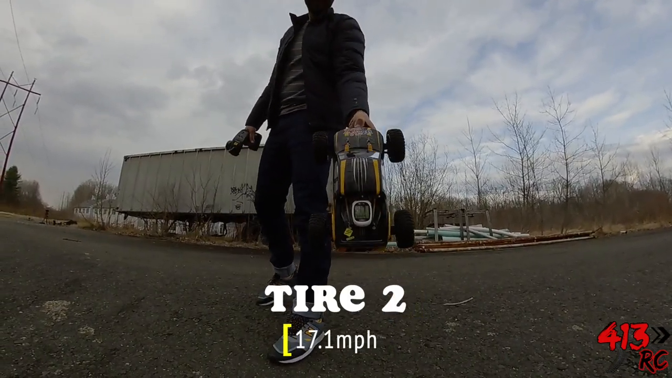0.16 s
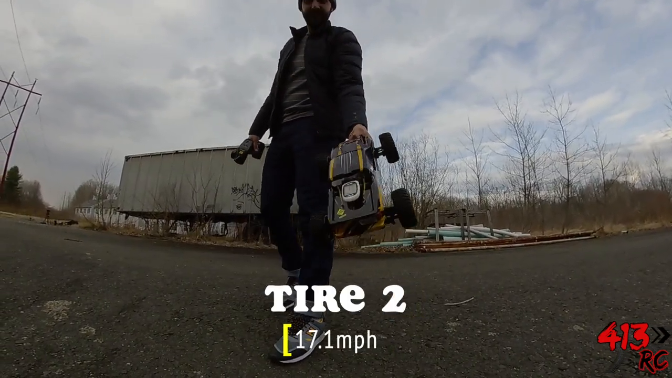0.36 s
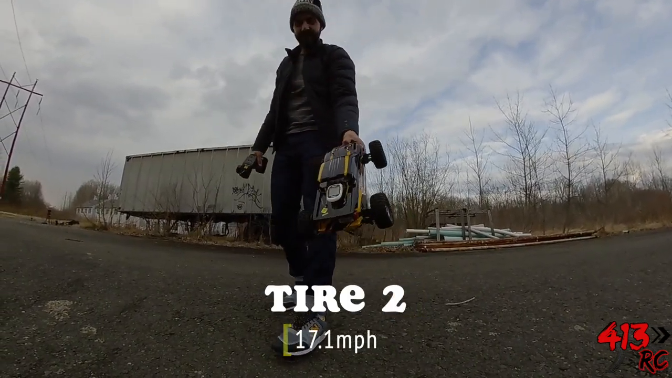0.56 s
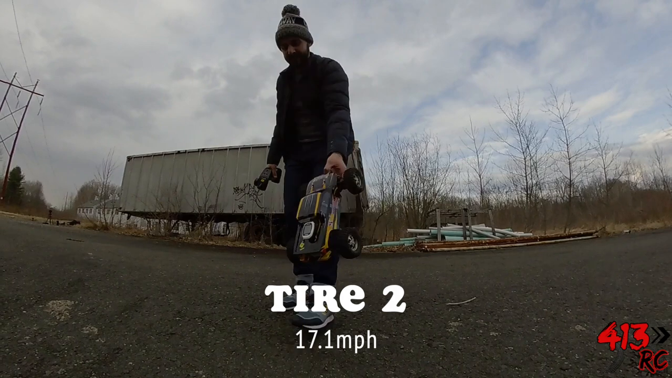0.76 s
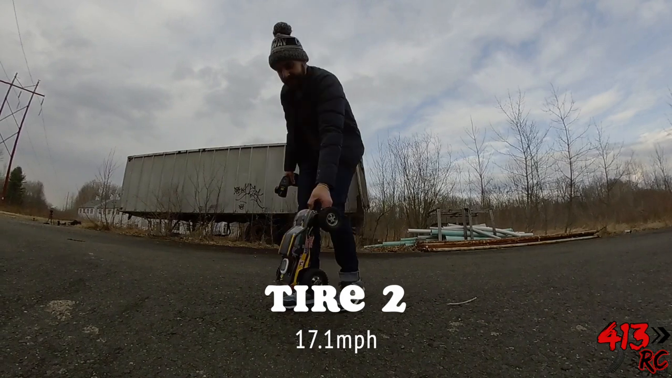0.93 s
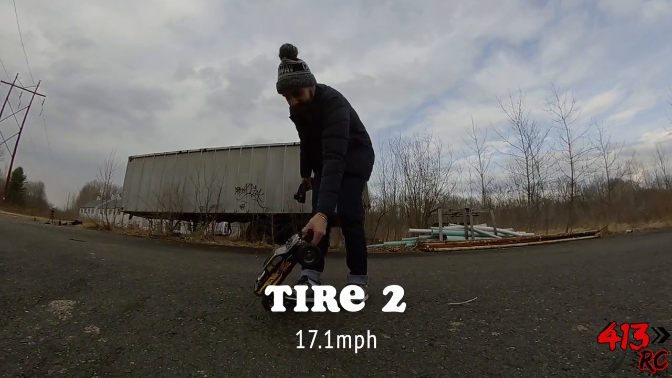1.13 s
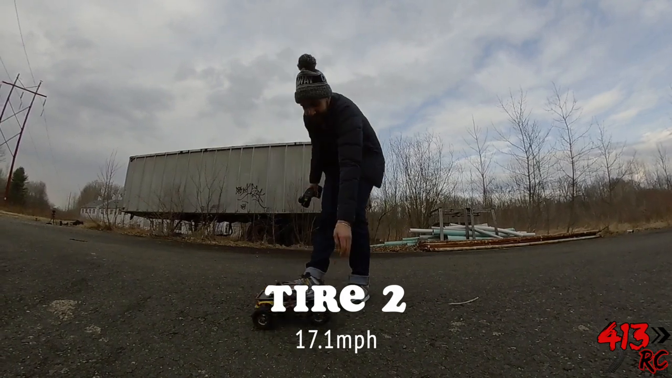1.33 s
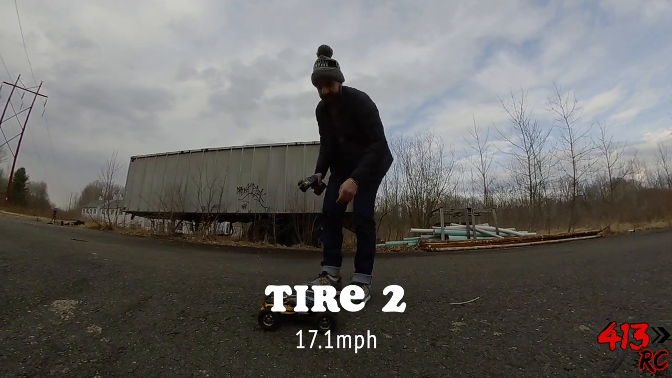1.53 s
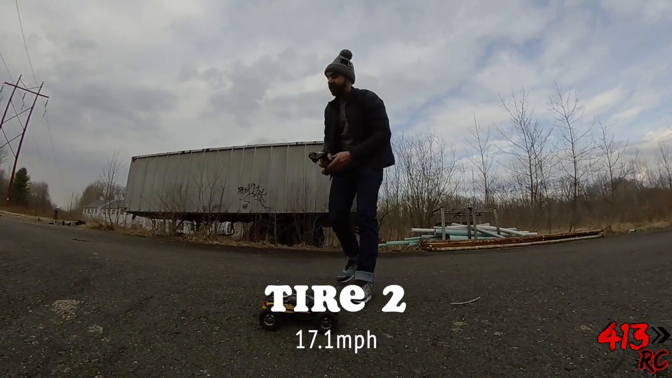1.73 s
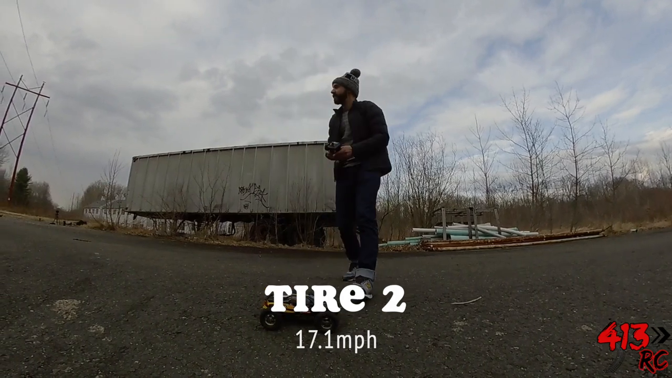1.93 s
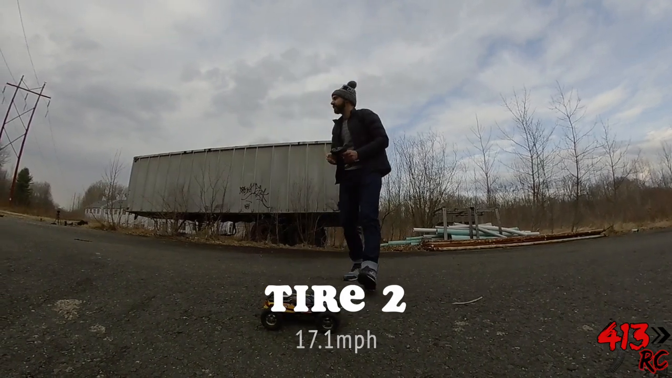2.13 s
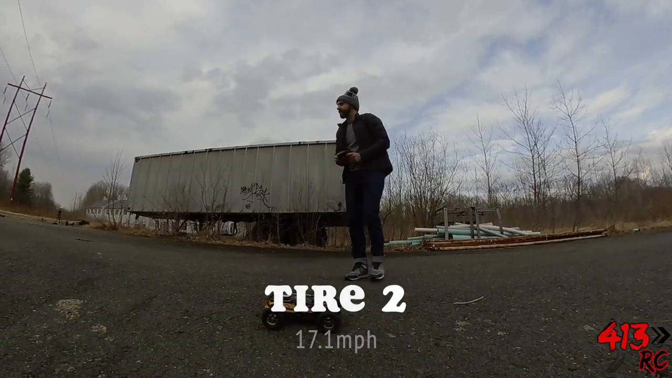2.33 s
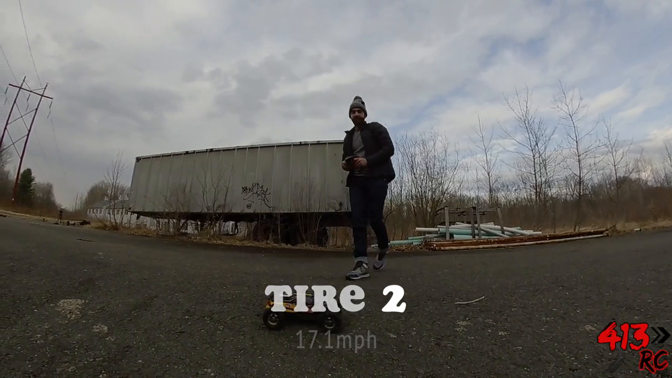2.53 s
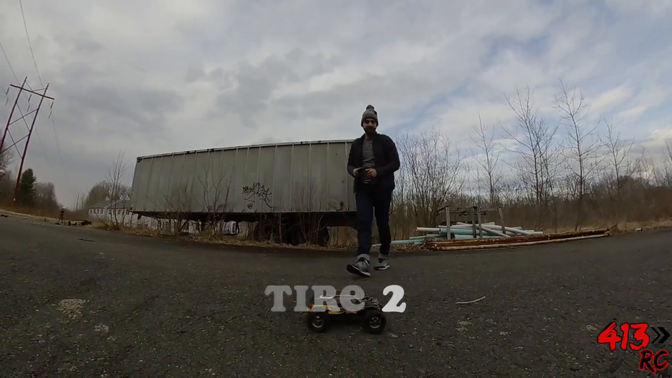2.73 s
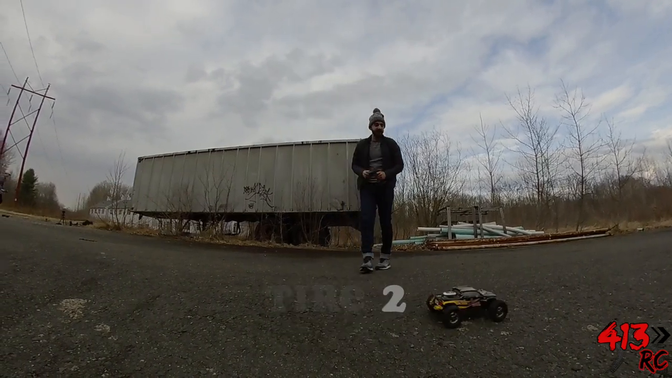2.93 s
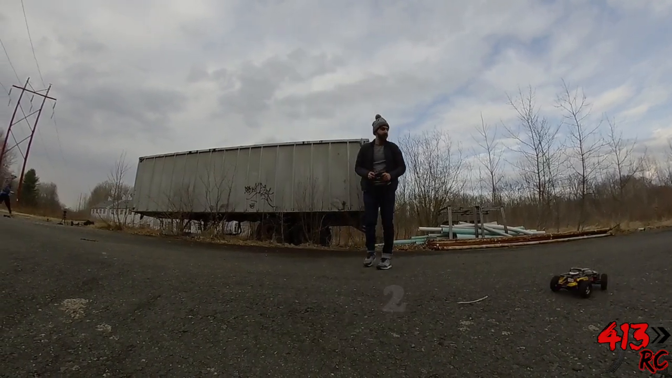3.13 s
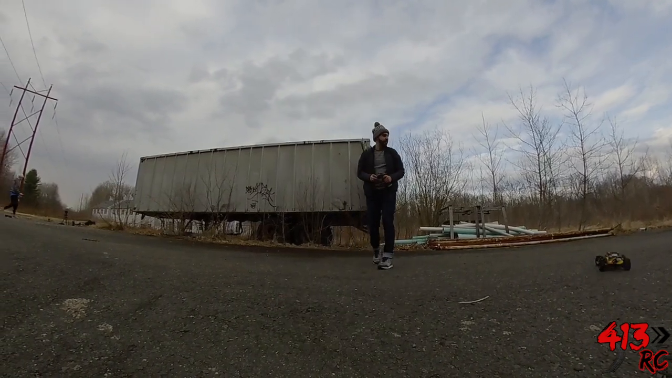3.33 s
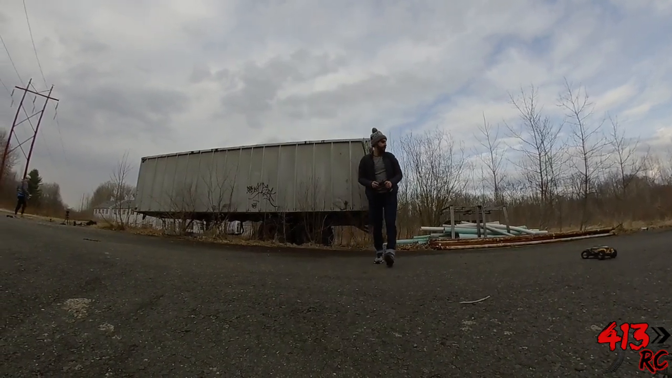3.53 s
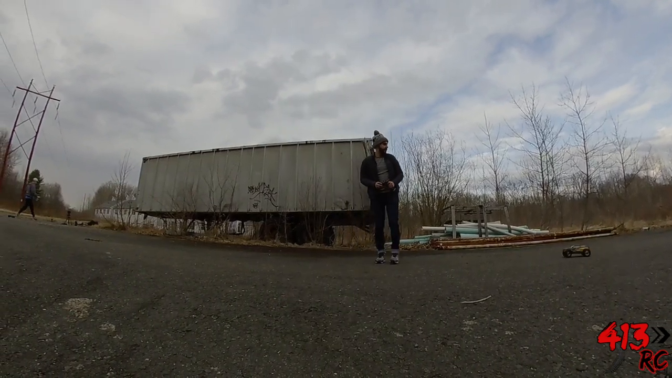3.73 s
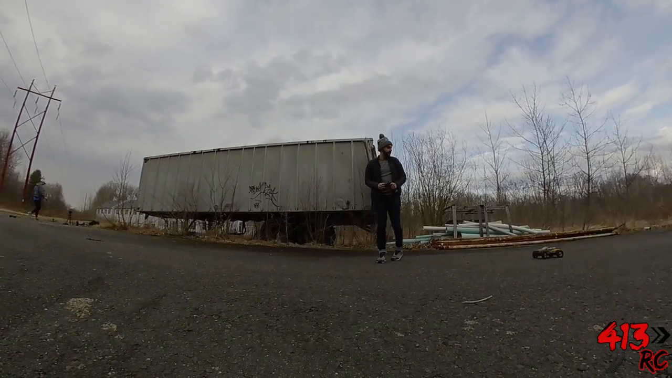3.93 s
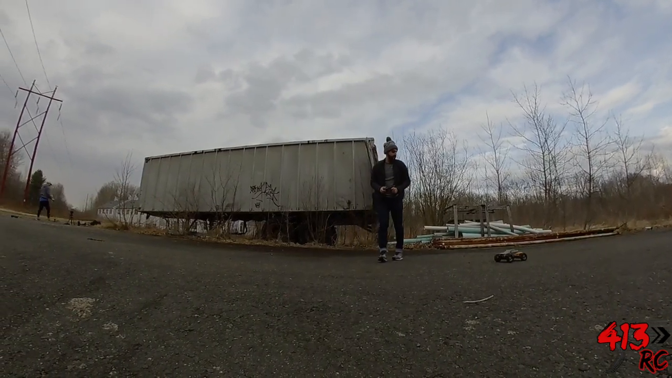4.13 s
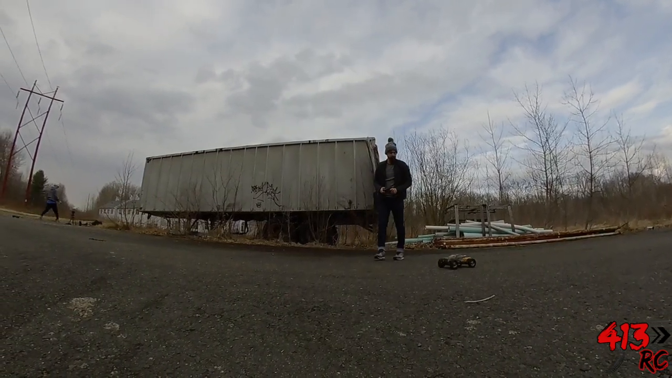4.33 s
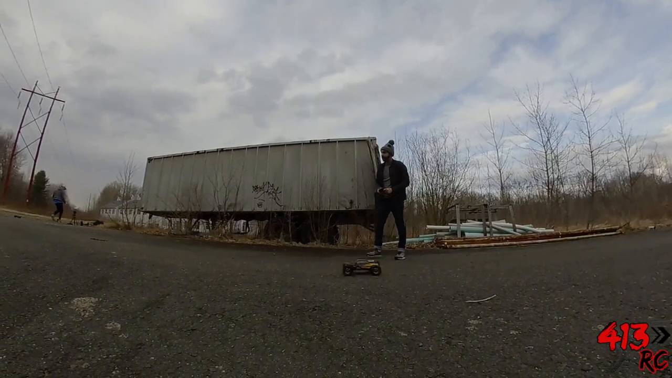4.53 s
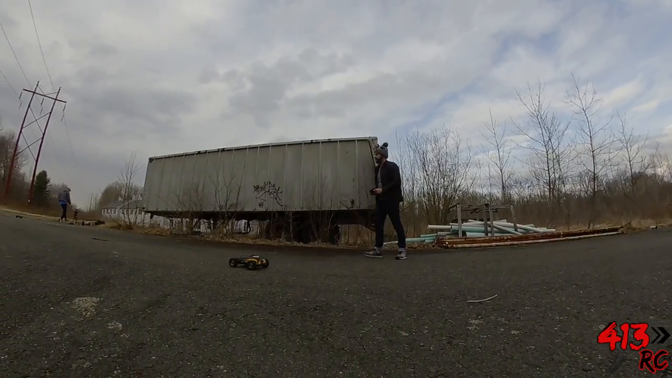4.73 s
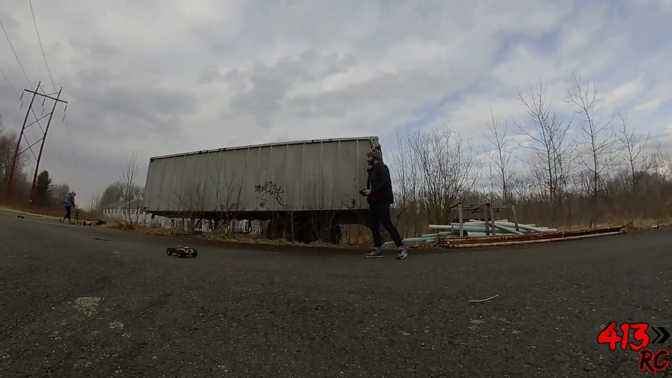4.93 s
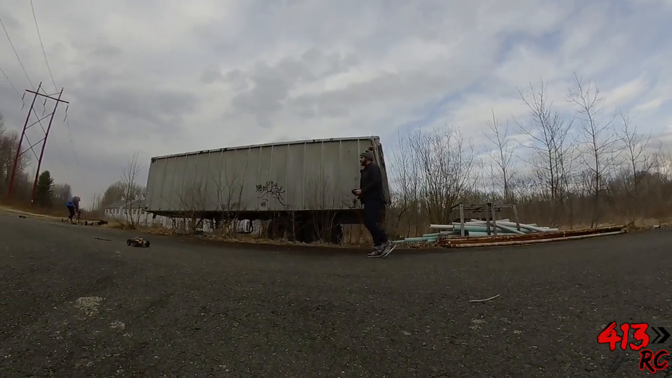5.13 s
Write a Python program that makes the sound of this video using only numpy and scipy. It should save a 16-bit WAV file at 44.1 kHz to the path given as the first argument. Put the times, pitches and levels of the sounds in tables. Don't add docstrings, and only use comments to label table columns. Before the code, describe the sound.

Shoes scrape on grit, a plastic toy truck drops with a rattle, and its motor whines upward over roaring tyres and flicked stones.

```python
import sys
import numpy as np
from scipy import signal
from scipy.fft import rfft, irfft, next_fast_len
from scipy.io import wavfile
from scipy.ndimage import uniform_filter1d, map_coordinates

SR = 44100
rng = np.random.default_rng(int(sys.argv[2]) if len(sys.argv) > 2 else 0)


def to_wav(sig):
    pcm = np.clip(np.atleast_2d(sig), -1, 1) * 32767
    pcm = np.round(pcm).astype(np.int16)
    wavfile.write(sys.argv[1], SR, pcm.T)


def decibels_to_gain(level_db):
    exponent = np.asarray(level_db, float) / 20
    return 10 ** exponent


N = 227688
TIME = np.arange(N) / SR

# pitch in Hz, level in dB per Hz.
TRAFFIC_COLOUR = [(12, -61), (20, -26), (32, -52), (107, -20.5), (146, 1.5), (290, -11), (335, -12),
                  (447, -13.5), (1350, -29.5), (1500, -40), (1950, -61), (3300, -120)]
TRAFFIC_DB = -58
# pitch in Hz, level in dB per Hz.
RUSTLE_COLOUR = [(410, -28), (700, -2.5), (859, -2.5), (6270, -15.5), (8320, -10.5), (10200, -21),
                 (12500, -17), (13400, -41), (15000, -53)]
# time in seconds, level in dB.
RUSTLE_LEVEL = [(0, -61.5), (.4, -63), (.9, -60), (1.24, -63), (1.52, -61), (1.96, -61.5), (2.14, -65.5)]

# start in seconds, peak in dB, ring in Hz, low knock in dB.
SHOE_GRIT = [(0.0044, -47.5, 1450, -14), (0.0822, -40, 7440, -28), (0.141, -41.5, 7000, -8),
             (0.277, -47, 6500, -20), (0.3401, -51, 1920, -13), (0.411, -48, 6000, -20),
             (0.4299, -42, 3400, -20), (0.4675, -41, 4000, -19), (0.472, -39.5, 7000, -19),
             (0.511, -48, 1750, -4), (0.578, -50, 2090, -10), (0.626, -46.5, 1846, -12),
             (0.661, -45, 4500, -18), (0.6655, -37, 4150, -18), (0.935, -37, 1500, -20),
             (1.0021, -42, 3410, -21), (1.1, -46, 2510, -18), (1.1384, -49, 3030, -8),
             (1.2233, -44, 2600, -1), (1.2636, -47, 1250, 3), (1.798, -48.5, 1640, -18),
             (1.8517, -46, 1350, 7.5), (1.9, -42.5, 2200, -18), (1.952, -36, 4500, -16),
             (1.971, -43, 2630, -24), (2.053, -44, 5000, -20), (2.058, -31, 5200, -14),
             (2.0715, -33, 2100, 5), (2.1346, -51, 1210, 9), (2.3675, -41, 1630, -19)]
# start in seconds, peak in dB, ring in Hz, low knock in dB.
TYRE_STONES = [(2.7236, -27, 1470, -13), (2.8723, -31, 1380, -1.5), (3.0117, -22, 1010, -12),
               (3.1946, -30, 1450, -15), (3.226, -33, 2500, -12), (3.282, -33, 520, -6),
               (3.325, -32, 660, -6), (3.4231, -31, 1210, -6), (3.581, -28, 1400, -6),
               (3.8046, -37, 1956, -21), (3.9095, -32, 3020, -12), (3.9125, -23, 1300, -16),
               (3.917, -26, 950, -16), (4.247, -29, 700, -6), (4.361, -34, 2140, -15),
               (4.5648, -26.5, 1070, -12), (4.6648, -30.5, 7500, -8), (4.9154, -37, 1604, -8),
               (5.0545, -23.5, 1650, -16)]
SNAP = 6
# start in seconds, length in seconds, level in dB,
# sand over rubber in dB, dust over sand in dB.
SOLE_SCUFFS = [(.934, 0.056, -41, -10.5, -10), (2.047, 0.042, -60, 9, -5), (.662, 0.029, -62.5, 8, -30),
               (.43, 0.08, -66, 5, -30), (1.755, 0.046, -68, 10, 0), (2.115, .03, -59, -7, -30),
               (1.42, 0.088, -54, -4, -10), (.76, .14, -69, 2.5, -8), (2.545, 0.027, -60, -9, -30),
               (0.0, .025, -62, 4, -30)]
# pitch in Hz, width in Hz, level in dB.
SOLE_RINGS = [(680, 810, -4.5), (1450, 250, 3.5), (1860, 310, -3.5), (2820, 550, -4.5)]
# pitch in Hz, width in Hz, level in dB.
SAND_RINGS = [(4230, 2700, -3), (8100, 1600, -2.5)]
# pitch in Hz, width in Hz, level in dB.
DUST_RINGS = [(14800, 2000, 0)]

# start in seconds, peak in dB,
# thump in dB, grit in dB, pitch of the part struck in Hz.
WHEEL_LANDINGS = [(1.355, -30, -14, -30, 500), (1.368, -21.5, -12, -28, 800), (1.377, -17, -6, -12, 1600),
                  (1.383, -24, -14, -20, 650), (1.3875, -13, -24, -14, 800), (1.391, -8.5, -24, -16, 600),
                  (1.396, -16, -32, -14, 620), (1.401, -18, -38, -6, 1900), (1.408, -19, -29, -14, 520),
                  (1.424, -30, -19, -14, 420), (1.44, -31, -20, -21, 350), (1.474, -36, -23.5, -21, 800),
                  (1.528, -33, -30, -30, 1250), (1.535, -32.5, -30, -30, 1300), (1.541, -38, -30, -30, 900)]
# pitch in Hz, width in Hz, level in dB.
BODY_RINGS = [(275, 180, -2), (647, 244, 5), (1310, 680, -4), (1940, 430, -2.5), (3400, 1200, -14),
              (7750, 4100, -20)]
CONTACT_S = .024
PART_DB = 7
FAVOUR_DB = 4
PUSH_S, PUSH_DB, PUSH_LENGTH_S = 1.378, -56, .008

# time in seconds, chop pitch in Hz, level in dB.
STALLED_MOTOR = [(2.52, 1120, -64), (2.54, 1115, -54), (2.555, 1117, -43.5), (2.59, 1096, -43),
                 (2.62, 1095, -43), (2.65, 1092, -50)]
# multiple of the chop pitch, level in dB.
CHOP_OVERTONES = [(2, -65), (3, -73), (4, -77), (5, -65), (7, -74)]

# time in seconds, tyre roar in dB, drivetrain hiss in dB.
ROLLING_LEVELS = [(2.56, -53.5, -74), (2.62, -51, -63.5), (2.67, -42, -50.5), (2.75, -38, -46.5),
                  (2.86, -39.5, -41.5), (3.05, -38, -40.5), (3.14, -38, -41.5), (3.21, -39, -44),
                  (3.63, -44, -52.5), (3.67, -47, -53), (3.8, -45, -46.5), (4.08, -43, -44.5),
                  (4.44, -43, -45), (4.51, -37.5, -43.5), (4.6, -36, -43), (4.645, -41, -46),
                  (4.75, -41.5, -48), (5.16, -45, -43.5)]
# pitch in Hz, level in dB per Hz.
ROAR_COLOUR = [(120, -34), (200, -11), (285, -11.5), (431, 2), (646, -4), (1100, -11), (1500, -18),
               (1950, -23), (3300, -120)]
# pitch in Hz, level in dB per Hz.
RATTLE_COLOUR = [(350, -29), (600, -5), (1330, 0), (2500, -9), (3120, -10), (3930, -20.5), (5000, -24.5),
                 (6500, -28), (11000, -120)]
# pitch in Hz, level in dB per Hz.
HISS_COLOUR = [(2060, -12), (3500, -2), (3940, -6), (6080, -2), (7900, 3), (9040, -4), (10600, -15.5),
               (12000, -28.5), (15600, -55), (22000, -120)]
# pitch in Hz, level in dB per Hz.
FIZZ_COLOUR = [(6760, -40), (11500, -11), (12300, -9), (13300, 1), (13800, 3), (14500, -1), (15000, -4),
               (15500, -12)]
# time in seconds, extra level in dB.
ROAD_CRACKS = [(2.672, 4.5), (2.72, 4), (2.8, 5), (2.88, 3), (2.93, 3), (3.02, 2.5), (4.57, 1.5),
               (4.67, 0.5)]
JOLT_S = 0.011
RATTLE_DB, RATTLE_GROWS = 1, 1.17
TORQUE_DB, STALL_HZ, FREE_HZ = 6, 900, 3160
FIZZ_DB, FIZZ_GROWS, THROTTLE_FIZZ_DB = -57.5, 1.15, 3

# time in seconds, gear tooth pitch in Hz, steady whine in dB.
FIRST_PULL = [(2.615, 450, -56), (2.65, 800, -37), (2.675, 1130, -28.5), (2.72, 1350, -34),
              (2.77, 1505, -32), (2.828, 1600, -58), (2.848, 1950, -50), (2.98, 2320, -56),
              (3.15, 2540, -58)]
# time in seconds, gear tooth pitch in Hz, steady whine in dB.
SECOND_PULL = [(3.66, 1010, -44), (3.735, 1260, -44), (3.78, 1540, -56), (3.94, 2050, -58),
               (4.12, 2420, -58), (4.4, 2720, -59), (4.55, 3280, -58), (4.81, 2740, -56), (4.95, 3080, -52),
               (5.16, 3330, -59)]
# on in seconds, off in seconds.
THROTTLE_ON = [
    (2.62, 3.165),
    (3.66, 4.635),
    (4.785, 6),
]
# landing in seconds,
# bite length in seconds, overspin as a share, whine in dB, lead of the whine in seconds.
WHEEL_BITES = [(2.7, .02, .06, -42, 0), (2.742, .018, .17, -36, .015), (2.785, .012, .13, -41, .015),
               (2.813, .016, .16, -35, -.004), (2.876, .016, .17, -40, .004), (2.907, .018, 0, -38, 0),
               (2.952, .02, .21, -37, 0), (2.996, .024, .13, -35, 0), (3.04, .03, .09, -36, 0),
               (3.1, .014, .09, -46, .02), (3.71, .02, .21, -40, 0), (3.752, .013, .13, -41, .022),
               (3.765, .016, .13, -37, -.002), (3.8, .016, .27, -41, 0), (3.838, .006, .16, -42, .024),
               (3.878, .014, .17, -40, 0), (3.924, .016, .13, -43, 0), (3.955, .022, .17, -43, 0),
               (3.996, .014, .21, -40, 0), (4.036, .04, .17, -44, .03), (4.07, .02, .08, -43, .012),
               (4.092, .034, .1, -42, 0), (4.15, .03, .1, -58, .04), (4.18, .065, .09, -47, -.012),
               (4.27, .03, .09, -56, 0), (4.3, .035, .07, -45, -.01), (4.365, .045, .06, -51, -.01),
               (4.435, .06, .05, -51, 0), (4.6, .035, .04, -55, 0), (4.79, .03, .07, -52, 0)]
SPIN_UP_S = .022
# tooth pitch in Hz, level in dB.
SECOND_HARMONIC = [(600, 3), (1000, -21), (1330, -18), (1500, -15), (1660, -18), (1780, -32), (2650, -26),
                   (2950, -12), (3100, -2), (3330, 8)]
STANDING_START_DB = 9
# tooth pitch in Hz, level in dB.
THIRD_HARMONIC = [(1500, -33), (1900, -13), (2500, -4), (2800, -3), (3100, -12), (3400, -22)]
# start in seconds, length in seconds,
# lift of the third harmonic in dB.
CLEAR_RINGS = [(2.84, .03, 4), (2.905, .022, 7), (3.072, .032, 7), (3.11, .012, 5), (3.132, .014, 5),
               (4.045, .05, 2), (4.14, .05, 2), (4.235, .025, 4), (4.32, .02, 4), (4.365, .045, 1)]
# start in seconds, length in seconds, pitch in Hz, width in Hz, level in dB.
BEARING_SQUEALS = [(3.187, .018, 8300, 500, -52), (3.775, .03, 7800, 500, -58),
                   (4.658, .03, 7700, 700, -49), (4.84, .03, 8200, 400, -56), (5.05, .2, 7300, 600, -53)]

# pitch in Hz, level in dB.
MICROPHONE = [(20, -18), (70, -25), (130, -0.5), (300, -3), (9000, 0.5), (11000, -14), (14000, -4),
              (15900, -9)]


def unit(x):
    return x / np.sqrt(np.mean(x ** 2) + 1e-20)


def peak1(x):
    return x / np.abs(x).max()


def add(out, s, x):
    part = out[round(s * SR):][:len(x)]
    part += x[:len(part)]


def curves(rows):
    s, *cols = np.transpose(rows)
    return [np.interp(TIME, s, c) for c in cols]


def law(points, hz):
    return decibels_to_gain(np.interp(hz, *np.transpose(points)))


def gate(start, end, edge):
    inside = np.minimum(TIME - start, end - TIME)
    return np.sin(np.pi / 2 * np.clip(inside / edge + .5, 0, 1)) ** 2


def wobble(rate):
    return map_coordinates(rng.standard_normal(int(N * rate / SR) + 4), [TIME * rate])


def filtered(x, response):
    m = next_fast_len(len(x) + 4096)
    return irfft(rfft(x, m) * response(np.fft.rfftfreq(m, 1 / SR)), m)[:len(x)]


def resonant(x, modes):
    def response(f):
        return sum((-1) ** k * decibels_to_gain(db) * 1j * f * w / (c * c - f * f + 1j * f * w)
                   for k, (c, w, db) in enumerate(modes))
    return filtered(x, response)


def coloured(x, spectrum):
    hz, db = np.transpose(spectrum)
    return filtered(x, lambda f: decibels_to_gain(np.interp(np.log(f + 1), np.log(hz), db)))


def rush(spectrum, grain_db, grain_rate, patchy_db):
    lumpy = rng.standard_normal(N) * decibels_to_gain(grain_db * wobble(grain_rate))
    z = signal.stft(lumpy, nperseg=512)[2]
    patches = uniform_filter1d(rng.standard_normal(z.shape), size=5, axis=0)
    patches = unit(uniform_filter1d(patches, size=5, axis=1))
    noise = signal.istft(z * decibels_to_gain(patchy_db * patches), nperseg=512)[1][:N]
    return unit(coloured(noise, spectrum))


def burst(length, rise=0.00087):
    t = TIME[:SR // 8]
    return rng.standard_normal(len(t)) * decibels_to_gain(-60 * t / length) * (1 - np.exp(-t / rise))


def blow(length):
    return burst(length, rise=.0003) + SNAP * (np.arange(SR // 8) == 2)


def drive():
    throttle = sum(gate(on, off, .03) for on, off in THROTTLE_ON)
    return (*curves(FIRST_PULL + SECOND_PULL), throttle)


def background():
    rustle_db, = curves(RUSTLE_LEVEL)
    hum = decibels_to_gain(TRAFFIC_DB) * rush(TRAFFIC_COLOUR, grain_db=1.5, grain_rate=12, patchy_db=1.5)
    rustle = rush(RUSTLE_COLOUR, grain_db=1.0, grain_rate=200, patchy_db=2.0)
    return hum + decibels_to_gain(rustle_db + 0.5 + 1.3 * wobble(13.9)) * rustle


def scuffs():
    rubber, sand, dust = np.zeros((3, N))
    for s, length, db, sand_db, dust_db in SOLE_SCUFFS:
        edges = np.minimum((TIME - s) / 0.0011, (s + length - TIME) / 0.0084)
        stroke = decibels_to_gain(db - 3 * (TIME - s) / length) * np.clip(edges, 0, 1)
        rubber += stroke
        sand += decibels_to_gain(sand_db) * stroke
        dust += decibels_to_gain(sand_db + dust_db) * stroke
    grains = rng.standard_normal(N) * decibels_to_gain(3.4 * wobble(400) + 1.5 * wobble(120))
    dull = resonant(resonant(grains, SOLE_RINGS), [(1290, 5000, 0)])
    fine = resonant(resonant(grains, SAND_RINGS), [(6000, 7000, 0)])
    finest = resonant(resonant(grains, DUST_RINGS), DUST_RINGS)
    return rubber * unit(dull) + sand * unit(fine) + dust * unit(finest)


def crunches(table, width, snap_db, length, tick_db):
    out = np.zeros(N)
    for s, db, hz, knock_db in table:
        crack = resonant(blow(length), [(hz, width * hz, 0), (1.85 * hz, 0.58 * hz, snap_db)])
        crack = filtered(crack, lambda f: 1 / (1 + 1j * f / (1.7 * hz)) ** 2)
        knock = resonant(blow(.6 * length), [(293, 206, 0), (750, 550, -9)])
        tick = resonant(blow(0.52 * length), [(4800, 2300, 0), (8000, 2500, -2)])
        tick = resonant(tick, [(6000, 6000, 0)])
        hit = peak1(crack) + decibels_to_gain(knock_db) * peak1(knock) + decibels_to_gain(tick_db - 2.0) * peak1(tick)
        add(out, s, decibels_to_gain(db + 1.5) * hit)
    return out


def landing():
    out = np.zeros(N)
    soft_blow = 3 * np.exp(-((np.arange(SR // 8) - 30) / 5) ** 2)
    for s, db, thump_db, grit_db, part_hz in WHEEL_LANDINGS:
        modes = [(hz, width, level - FAVOUR_DB * abs(np.log2(hz / part_hz)))
                 for hz, width, level in BODY_RINGS]
        place = sum(hz < part_hz for hz, *_ in BODY_RINGS)
        modes.insert(place, (part_hz, .2 * part_hz, PART_DB))
        body = resonant(burst(CONTACT_S, rise=0.0015) + soft_blow, modes)
        body = filtered(body, lambda f: 1 / (1 + 1j * f / 3500))
        grit = resonant(burst(2.1 * CONTACT_S), [(3800, 2500, 13), (7800, 3000, -16)])
        thump = resonant(resonant(burst(0.011), [(145, 60, 0)]), [(150, 210, 0)])
        hit = peak1(body) + decibels_to_gain(thump_db) * peak1(thump) + decibels_to_gain(grit_db + 1) * peak1(grit)
        add(out, s, decibels_to_gain(db - 0.5) * hit)
    return out


def push():
    u = np.clip((TIME - PUSH_S) / PUSH_LENGTH_S, 0, 50)
    return decibels_to_gain(PUSH_DB) * np.e * u * (2 - u) * np.exp(-u)


def windings():
    hz, db = curves(STALLED_MOTOR)
    turn = 2 * np.pi * np.cumsum(hz) / SR
    jerks = .55 + .45 * np.cos(2 * np.pi * 80 * (TIME - 2.553))
    jerks = jerks * decibels_to_gain(3 * wobble(60))
    tone = decibels_to_gain(db + 2.5) * jerks * np.sin(turn + 0.7 * wobble(150))
    overtones = sum(decibels_to_gain(level + 2.7 * wobble(35)) * np.sin(round(k) * turn) for k, level in CHOP_OVERTONES)
    return gate(2.522, 2.65, .012) * (tone + overtones)


def rolling():
    roar_db, hiss_db = curves(ROLLING_LEVELS)
    road_hz, _, throttle = drive()
    torque = throttle * np.clip((FREE_HZ - road_hz) / (FREE_HZ - STALL_HZ), 0, 1)
    jolt_db = sum(db * np.exp(-((TIME - s) / JOLT_S) ** 2) for s, db in ROAD_CRACKS)
    rattle_db = RATTLE_GROWS * (roar_db + 42) - 42 + RATTLE_DB + TORQUE_DB * torque + .3 * jolt_db
    fizz_db = FIZZ_DB + FIZZ_GROWS * (hiss_db + 43.5) + THROTTLE_FIZZ_DB * (throttle - 1) + .7 * jolt_db
    bumps = wobble(28.01)
    roar = rush(ROAR_COLOUR, grain_db=2.2, grain_rate=82, patchy_db=1.5)
    rattle = rush(RATTLE_COLOUR, grain_db=2.8, grain_rate=220, patchy_db=1.5)
    hiss = rush(HISS_COLOUR, grain_db=1.5, grain_rate=500, patchy_db=2.5)
    fizz = rush(FIZZ_COLOUR, grain_db=1.5, grain_rate=500, patchy_db=4)
    out = decibels_to_gain(roar_db + jolt_db + 0.6 * bumps) * roar
    out += decibels_to_gain(rattle_db - 2.0 + 0.95 * bumps) * rattle
    out += decibels_to_gain(hiss_db + 0.3 * jolt_db + 0.92 * bumps) * hiss
    out += decibels_to_gain(fizz_db + 2.2 * wobble(12)) * fizz
    return gate(2.56, 6, .04) * filtered(out, lambda f: f ** 4 / (f ** 4 + 165.0 ** 4))


def gears():
    road_hz, steady_db, throttle = drive()
    slip = sum(share * np.interp(TIME, [s - SPIN_UP_S, s, s + life], [0, 1, 0])
               for s, life, share, *_ in WHEEL_BITES)
    hz = uniform_filter1d(road_hz * (1 + slip), round(0.0055 * SR))
    hz = hz * (1 + 0.00607 * wobble(60))
    turn = 2 * np.pi * np.cumsum(hz) / SR
    rough = road_hz / FREE_HZ

    first = throttle * decibels_to_gain(steady_db + 1.5 * wobble(35) * rough)
    first = first + sum(decibels_to_gain(db) * gate(s - lead, s + life, 0.012) for s, life, _, db, lead in WHEEL_BITES)
    second = first * law(SECOND_HARMONIC, hz) * decibels_to_gain(STANDING_START_DB * gate(2.6, 2.835, .02))
    third = throttle * decibels_to_gain(curves(ROLLING_LEVELS)[1]) * law(THIRD_HARMONIC, road_hz)
    clear = sum(decibels_to_gain(db) * gate(s, s + life, .01) for s, life, db in CLEAR_RINGS)

    runout = 1 + .2 * np.sin(turn / 12) + .35 * rough * wobble(700)
    first_level = first * runout * decibels_to_gain(2.5 + 3.5 * rough * wobble(70))
    second_level = second * runout * decibels_to_gain(2 + 2.5 * rough * wobble(70))
    third_level = third * decibels_to_gain(1 + 2.5 * wobble(70)) * (.7 + clear + .8 * wobble(600))
    fifth_level = third * decibels_to_gain(-8 + 3 * wobble(40)) * wobble(1200)
    out = first_level * np.sin(turn + .5 * rough * wobble(300))
    out += second_level * np.sin(2 * turn + .6 * rough * wobble(300))
    out += third_level * np.sin(3 * turn)
    return out + fifth_level * np.sin(5 * turn)


def squeals():
    air = rng.standard_normal(N)
    out = np.zeros(N)
    for s, life, hz, width, db in BEARING_SQUEALS:
        ring = [(hz, width, 0)]
        out += decibels_to_gain(db) * gate(s, s + life, .015) * unit(resonant(resonant(air, ring), ring))
    return out


def yard(x):
    tail = filtered(burst(0.19), lambda f: 1 / (1 + 1j * f / 2500))
    return signal.fftconvolve(np.pad(x, (300, 0)), tail / np.linalg.norm(tail))[:N]


def scene():
    near = scuffs()
    near += crunches(SHOE_GRIT, width=0.85, snap_db=-11, length=0.011, tick_db=-11)
    near += landing() + gears()
    near += crunches(TYRE_STONES, width=0.25, snap_db=-8.5, length=0.015, tick_db=-17)
    near += squeals()
    heard = coloured(near + decibels_to_gain(-18.5) * yard(near), MICROPHONE)
    return (background() + heard + push() + windings() + rolling())[None]


def band_limit(x):
    return signal.sosfilt(signal.butter(12, 15720, fs=SR, output="sos"), x)


def record(dry):
    mix = filtered(dry[0], lambda f: f < 15720)[None]
    return band_limit(mix)


dry = scene()
out = record(dry)
to_wav(out)
```